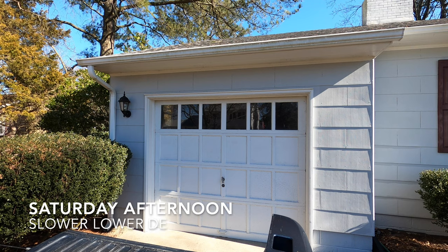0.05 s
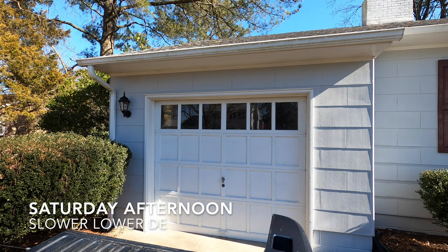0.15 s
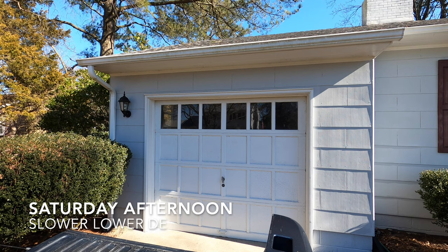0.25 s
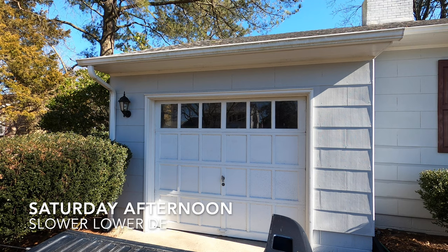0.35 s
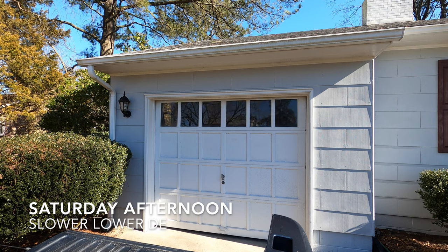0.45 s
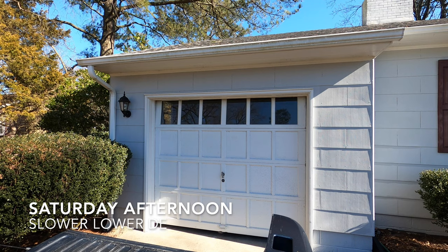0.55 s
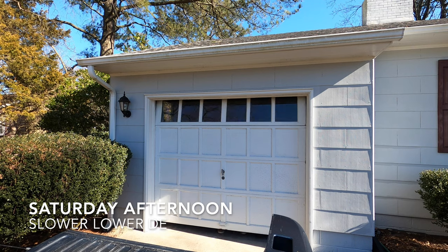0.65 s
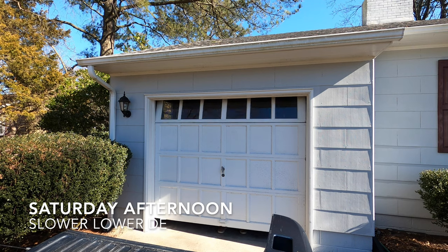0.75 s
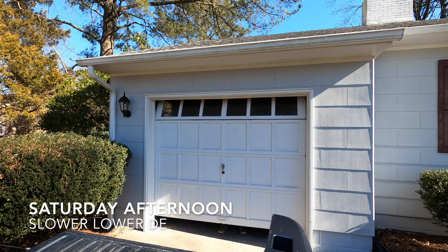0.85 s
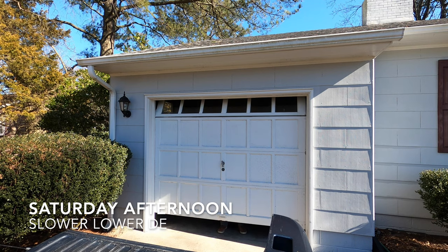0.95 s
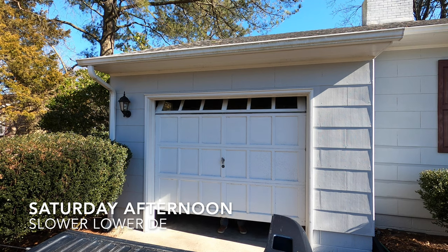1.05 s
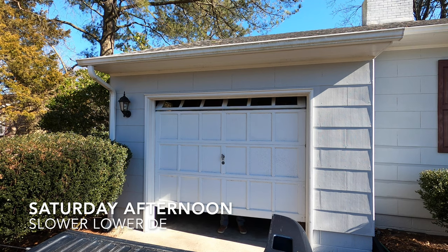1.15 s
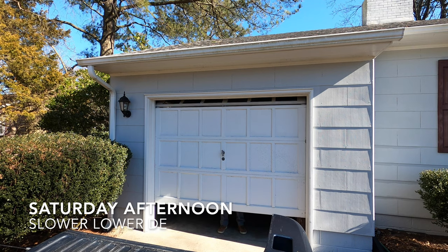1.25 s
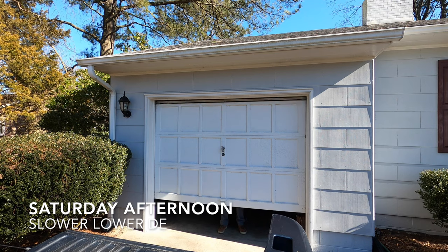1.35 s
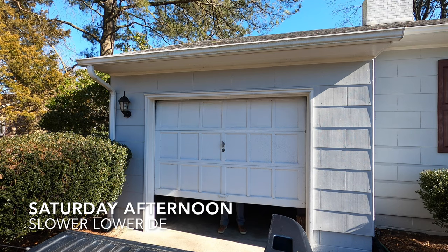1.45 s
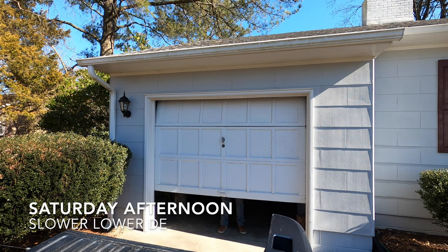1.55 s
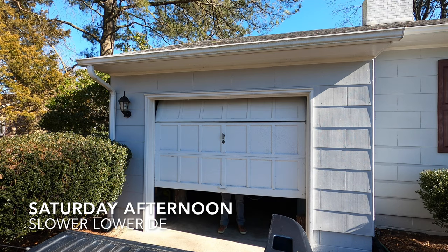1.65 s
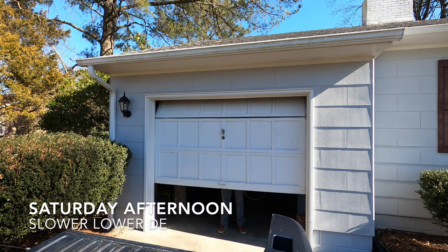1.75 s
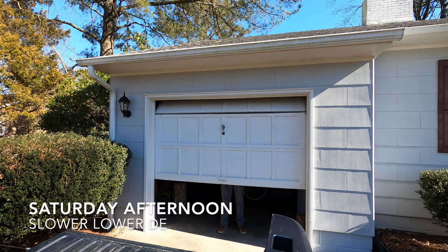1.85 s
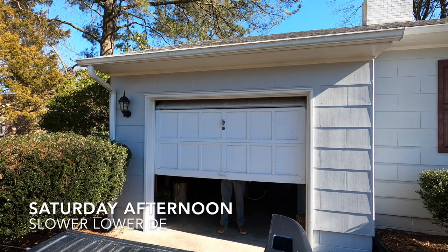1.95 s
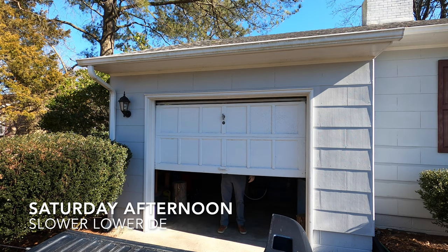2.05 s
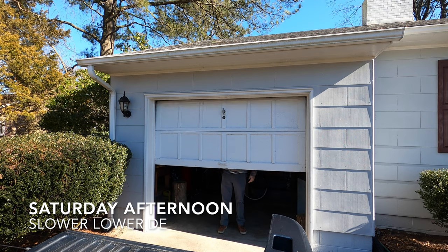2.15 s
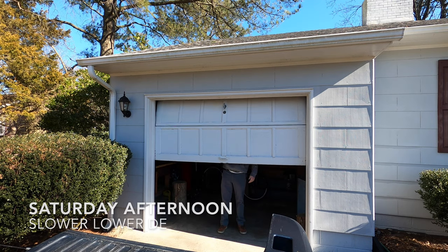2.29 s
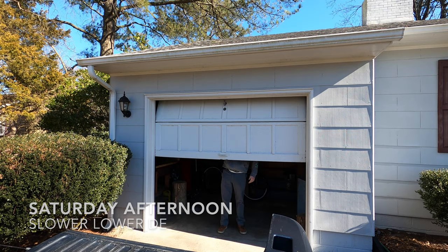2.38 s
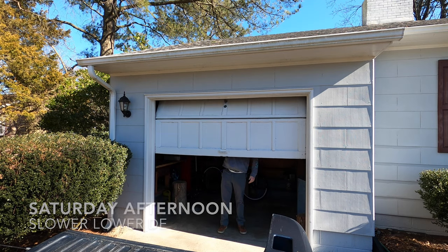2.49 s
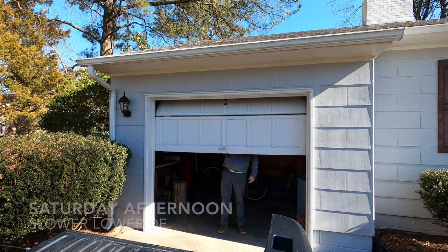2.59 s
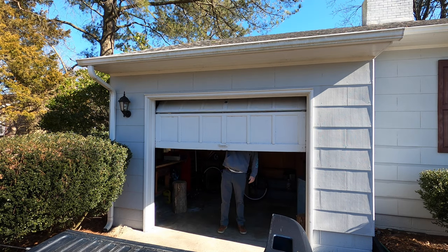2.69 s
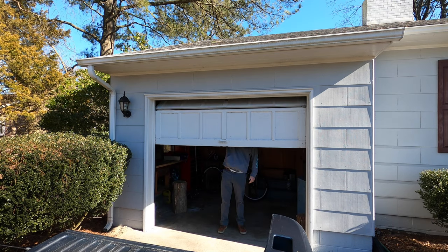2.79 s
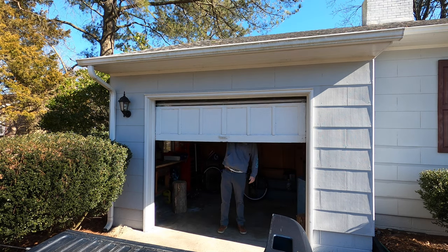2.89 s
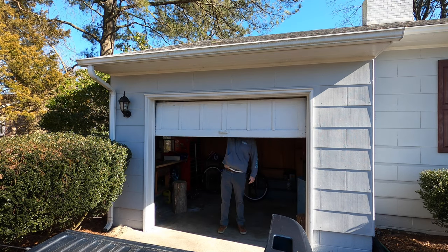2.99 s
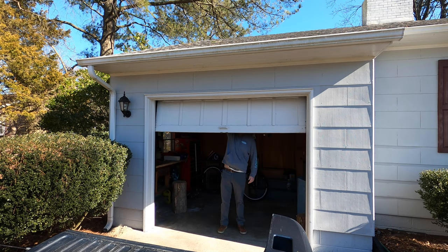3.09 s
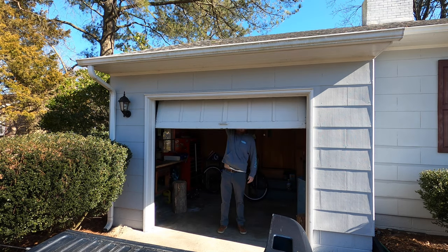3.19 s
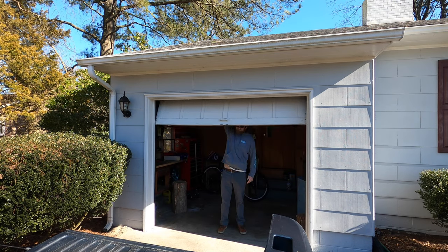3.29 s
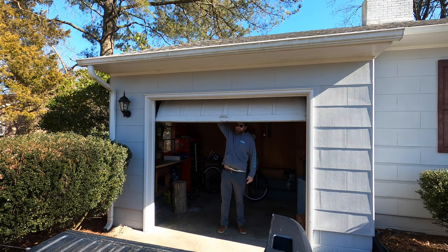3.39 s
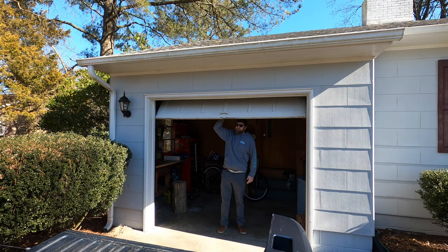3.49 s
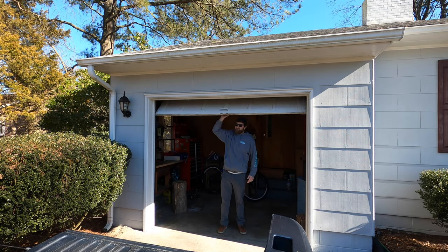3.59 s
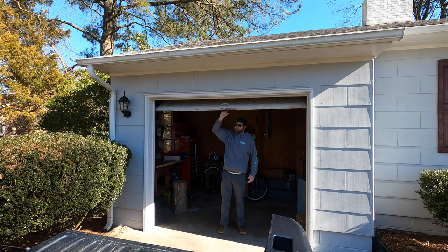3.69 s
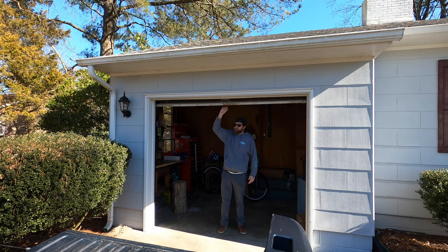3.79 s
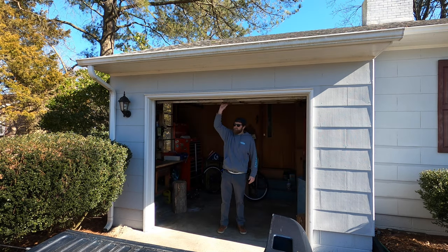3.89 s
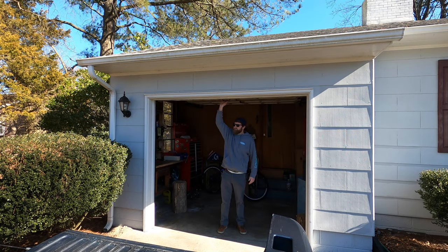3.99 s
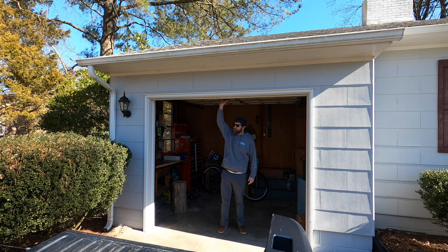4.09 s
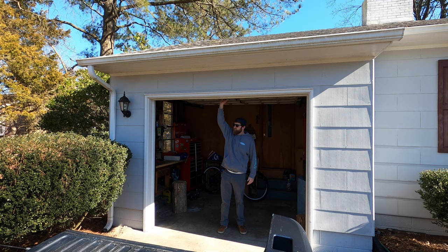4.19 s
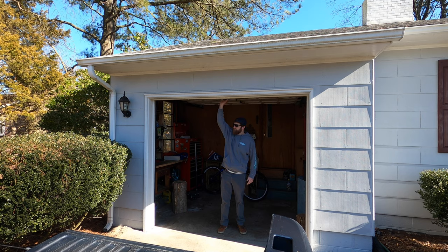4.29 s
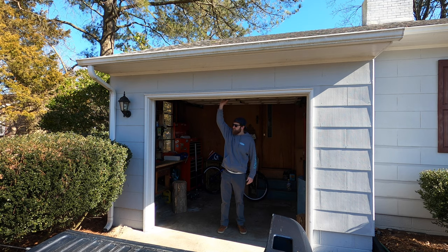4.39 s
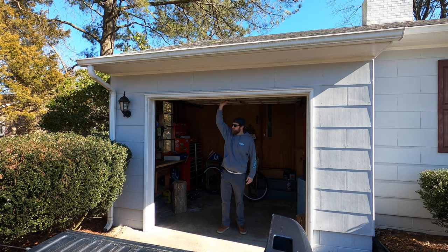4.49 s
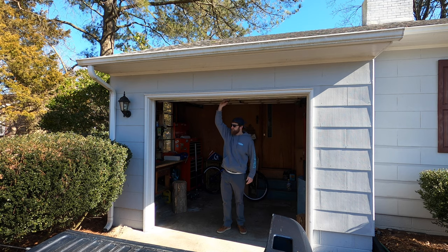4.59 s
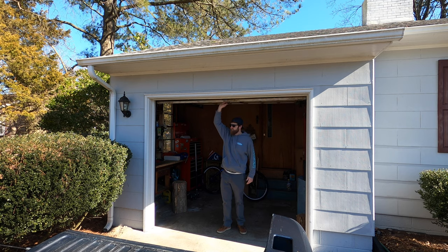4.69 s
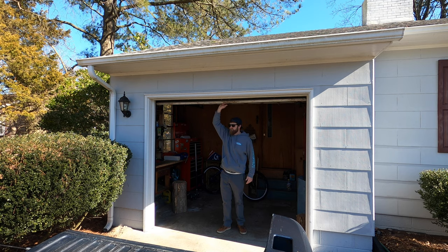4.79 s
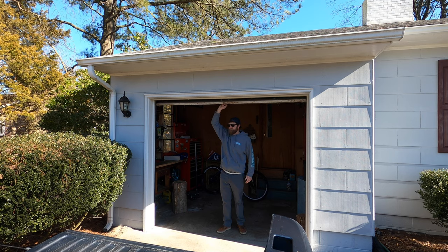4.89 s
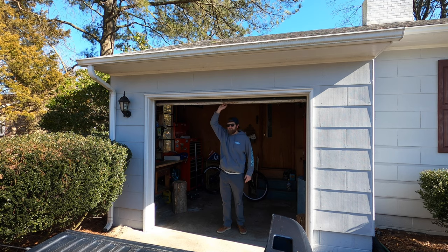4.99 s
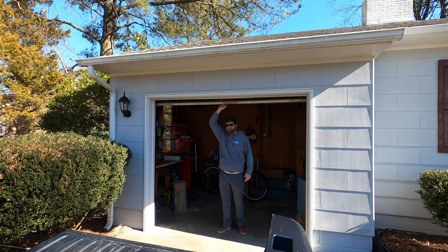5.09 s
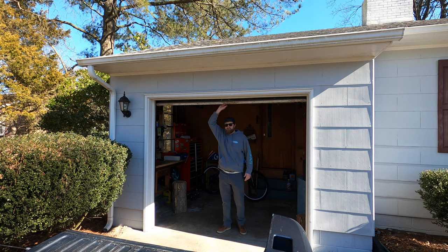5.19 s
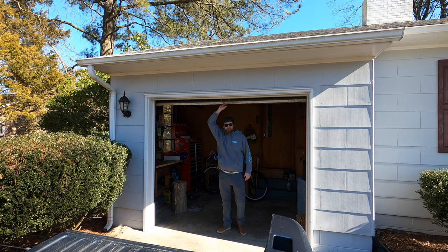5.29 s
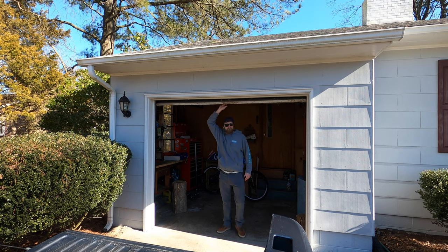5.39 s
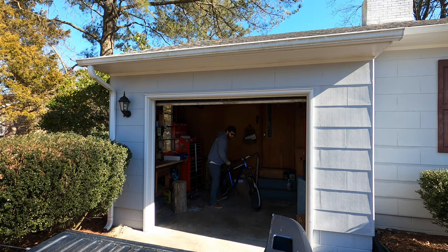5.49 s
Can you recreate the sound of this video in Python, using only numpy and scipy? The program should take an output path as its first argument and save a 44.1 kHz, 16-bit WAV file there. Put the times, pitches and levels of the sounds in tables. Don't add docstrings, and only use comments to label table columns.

```python
import sys
import numpy as np
from scipy import signal
from scipy.fft import rfft, irfft, next_fast_len
from scipy.io import wavfile
from scipy.ndimage import uniform_filter1d, map_coordinates

SR = 44100
rng = np.random.default_rng(int(sys.argv[2]) if len(sys.argv) > 2 else 0)


def to_wav(s):
    ch = np.atleast_2d(s).T
    pcm = np.round(np.clip(ch, -1, 1) * 32767)
    wavfile.write(sys.argv[1], SR, pcm.astype(np.int16))


def invert_db(level):
    return 10 ** (np.asarray(level, dtype=float) / 20)


N = 244622
STOP_S = 3.84
ECHO_SPAN_S = 0.2


def unit(x):
    return x / np.sqrt(np.mean(x ** 2) + 1e-20)


def along(points, hz):
    f, v = np.transpose(points)
    return np.interp(np.log(hz + 1), np.log(f + 1), v)


def curves(rows):
    s, *cols = np.transpose(rows)
    return [np.interp(np.arange(N) / SR, s, c) for c in cols]


def peaks_db(rows, rise_db_s, fall_db_s):
    rows = np.array(rows)
    late = np.arange(N) / SR - rows[:, :1]
    return np.max(rows[:, 1:] + np.where(late < 0, rise_db_s, -fall_db_s) * late, axis=0)


def wobble(rate):
    knots = rng.standard_normal(int(N * rate / SR) + 4)
    return map_coordinates(knots, [np.arange(N) * rate / SR])


def filtered(x, response):
    m = next_fast_len(len(x) + SR // 4)
    return irfft(rfft(x, m) * response(np.fft.rfftfreq(m, 1 / SR)), m)[:len(x)]


def resonances(modes):
    def response(f):
        return sum((-1) ** k * invert_db(db) * 1j * f * width / (hz * hz - f * f + 1j * f * width)
                   for k, (hz, width, db) in enumerate(modes))
    return response


def add(x, s, sound):
    part = x[round(s * SR):][:len(sound)]
    part += sound[:len(part)]


def patchy(x, depth_db):
    z = signal.stft(x, nperseg=256)[2]
    field = uniform_filter1d(rng.standard_normal(z.shape), size=3, axis=0)
    field = uniform_filter1d(field, size=9, axis=1)
    gain = invert_db(depth_db * (unit(field) - depth_db / 8))
    return signal.istft(z * gain, nperseg=256)[1][:N]


def yard():
    # start_s, hum_hz, hum_db
    machine = [(3.7, 120, -54), (3.864, 126.1, -63), (3.948, 126.2, -58), (4.276, 126.9, -59),
               (4.586, 127.8, -54), (4.8, 131.2, -55.5), (4.9, 130.7, -50), (5.19, 126.4, -51),
               (5.262, 124.1, -59.5), (5.385, 129, -59), (5.55, 125.5, -60)]
    # ratio, level_db
    partials = [(.63, -14), (0.999, -0.5), (1.63, -12)]
    # freq_hz, level_db per Hz
    air_tone = [(15, -64), (30, -59), (70, -27.5), (150, -12.5), (300, -18.5), (600, -25), (1500, -29.5),
                (4300, -41), (5500, -44), (10000, -55), (14000, -72)]
    # freq_hz, level_db per Hz
    hiss_tone = [(800, -30), (2000, 0), (4500, -3), (6000, -9), (10000, -15), (14000, -28)]
    # peak_s, peak_db
    shuffles = [
        (3.7, -59),
        (4.136, -65.5),
        (4.35, -68),
        (4.52, -68.5),
        (4.69, -63.5),
        (4.875, -59.5),
        (5.1, -64.5),
        (5.385, -60.5),
        (5.55, -54),
    ]
    hum_hz, hum_db = curves(machine)
    turns = np.cumsum(hum_hz) / SR
    hum = sum(invert_db(db + 1.4 * wobble(14)) * np.sin(2 * np.pi * ratio * turns + 0.35 * wobble(12))
              for ratio, db in partials)
    rustle_db = np.maximum(peaks_db(shuffles, rise_db_s=59, fall_db_s=50), -70)
    rustle_db = rustle_db - 2.5 + 0.8 * wobble(12)
    air = patchy(filtered(rng.standard_normal(N), lambda f: invert_db(along(air_tone, f))), 1.6)
    air = air / np.std(filtered(air, lambda f: f > 400))
    traffic = unit(filtered(rng.standard_normal(N), lambda f: resonances([(75, 80, 0)])(f) ** 2))
    hiss = unit(filtered(rng.standard_normal(N), lambda f: invert_db(along(hiss_tone, f))))
    return invert_db(-86.5) * hiss + invert_db(hum_db - 1.0) * hum + invert_db(rustle_db) * air + invert_db(-66) * traffic


def garage(x):
    # freq_hz, t60_s
    decay = [(100, .8), (500, 0.21), (3000, 0.4), (10000, 0.089)]
    out, step = np.zeros(N), round(ECHO_SPAN_S * SR)
    for start in range(0, N, step):
        hz, t, z = signal.stft(rng.standard_normal(SR * 3 // 4), SR, nperseg=256)
        dying = z * invert_db(-60 * t / along(decay, hz)[:, None])
        tail = signal.istft(dying, SR, nperseg=256)[1]
        echo = signal.fftconvolve(x[start:start + step], tail / np.linalg.norm(tail))
        add(out, (start + 250) / SR, echo)
    return out


def thumps():
    # start_s, pitch_hz, peak_db, t60_s
    swings = [(.0, 75, -34, 0.1), (.092, 113, -28, 0.09), (0.18, 156, -25, 0.038), (0.213, 124, -32, 0.16),
              (0.399, 116, -41, 0.079), (.512, 130, -37, .07), (.637, 125, -31, 0.075),
              (.66, 80, -38.5, .12), (0.98, 121, -36.5, 0.042), (1.075, 135, -28.5, 0.17),
              (1.18, 160, -26, 0.1), (1.21, 124, -25, 0.11), (1.255, 110, -31, .08), (1.3, 125, -32, .1),
              (1.36, 120.7, -24, 0.2), (1.41, 116.4, -27, 0.38), (1.546, 140, -32, 0.059),
              (1.629, 116, -35.5, 0.065), (1.94, 125, -38, .08), (1.991, 126, -37, 0.1),
              (2.04, 150, -39, .07), (2.085, 130, -39, .1), (2.73, 125, -38, .08), (2.805, 140, -39, .06),
              (2.2, 140, -41, .15), (2.33, 135, -39, .2), (2.43, 130.9, -36, 0.45), (2.6, 132, -42, 0.31),
              (2.849, 129, -37.5, 0.18), (2.899, 85, -37, 0.1), (3.03, 85, -39, .15), (2.4, 85, -41, .15),
              (3.15, 85, -37.5, 0.13), (3.259, 131, -29.5, 0.091), (3.327, 130, -27, .05),
              (3.368, 128, -26, 0.11), (3.51, 130, -35, .12), (3.615, 125, -42, .2), (3.775, 100, -50, .08),
              (3.438, 106, -30.5, 0.16), (3.72, 85, -47.5, .25), (5.528, 110.3, -47, 0.22)]
    # start_s, pitch_hz, peak_db
    knocks = [(.037, 390, -36), (.048, 780, -34), (.06, 420, -35), (.575, 600, -33), (.7, 390, -31),
              (.645, 1100, -34), (.727, 452, -30), (.815, 670, -32), (.85, 410, -31), (1.01, 660, -33),
              (1.078, 417, -32), (1.11, 780, -33), (1.14, 770, -32), (1.19, 740, -33), (1.21, 620, -32),
              (1.25, 620, -32), (.69, 1100, -36), (1.47, 910, -36), (1.153, 470, -30), (1.283, 401, -33),
              (1.327, 452, -32), (1.44, 900, -36), (1.47, 380, -33), (1.61, 490, -37), (1.865, 400, -35),
              (1.985, 390, -36), (2.18, 300, -37), (2.313, 415, -39), (2.49, 930, -39), (2.497, 423, -38),
              (2.54, 334, -36), (2.737, 500, -38), (3.062, 920, -33), (3.133, 950, -33), (3.202, 920, -35),
              (3.225, 400, -33), (3.313, 420, -29), (3.344, 423, -29), (3.357, 940, -32), (3.44, 400, -33),
              (3.65, 415, -47), (3.7, 400, -49), (.56, 519, -31), (.615, 479, -26.5), (.797, 385, -31),
              (1.37, 467, -25), (2.421, 411, -32), (2.563, 402, -31), (2.7, 436, -37), (2.78, 360, -37),
              (2.85, 395, -39.5), (2.924, 470, -42), (2.997, 473, -34), (3.064, 477, -37),
              (3.135, 385, -34), (3.2, 396, -30), (3.285, 441, -30), (4.67, 322, -60), (4.86, 396, -60.5),
              (5.2, 207, -60.5), (5.362, 420, -58.5)]
    out, t = np.zeros(N), np.arange(SR // 2) / SR
    blows = [(*row, 0.083 * row[3]) for row in swings]
    for s, hz, db in knocks:
        t60 = 0.06 if s < STOP_S else 0.13
        blows.append((s, hz, db, t60, 0.003))
    for s, hz, db, t60, rise in blows:
        shape = invert_db(db - 60 * t / t60) * (1 - np.exp(-t / rise))
        add(out, s, shape * np.sin(2 * np.pi * hz * t) * 2)
    return out


def latch_bar():
    # start_s, peak_db
    clinks = [
        (0.904, -43.5),
        (1.0983, -30),
        (1.302, -36.5),
        (1.379, -21.5),
        (1.4748, -27),
        (1.693, -45),
        (2.3347, -51),
    ]
    # pitch_hz, level_db, t60_s
    modes = [(3970, -3.5, 0.14), (4540, -11, 0.1), (7270, -6, 0.13), (7600, 3, .025), (8120, -6.5, 0.037),
             (9502, -25.5, .15), (11800, -24.5, 0.16), (12400, -26.5, .17)]
    out, t = np.zeros(N), np.arange(SR // 3) / SR
    shape = (1 - np.exp(-t / 0.0006)) * (1 - 0.38 * np.sin(2 * np.pi * 38 * t))  # attack, 38 Hz rocking
    for s, db in clinks:
        ring = sum(invert_db(level + rng.normal(0, 1.1) - 60 * t / t60) * np.sin(2 * np.pi * hz * t)
                   for hz, level, t60 in modes)
        add(out, s, invert_db(db - 5) * ring * shape)
    return out


def brackets():
    # (start_s, peak_db)
    struck = [(1502, .015, [(1.3684, -22)]), (3196, 0.042, [(1.567, -32.5), (1.627, -40), (3.274, -27.5),
              (4.076, -52), (4.862, -50)]), (4110, 0.09, [(1.256, -33), (1.8, -42), (2.424, -42),
              (2.775, -44)]), (3950, .16, [(2.996, -42.5), (3.212, -41), (3.24, -40), (3.285, -38),
              (3.312, -32)]), (4200, .025, [(1.115, -30), (1.152, -30), (1.28, -31), (1.311, -28),
              (1.326, -23), (1.343, -27)]), (4450, .04, [(1.095, -28), (1.128, -28), (1.352, -28),
              (1.478, -31), (1.948, -40), (2.74, -43)]), (2150, .08, [(1.86, -42), (2.424, -38),
              (2.985, -40)]), (2450, .08, [(2.355, -41), (3.065, -37), (3.145, -36), (3.35, -32)]),
              (3330, .05, [(1.629, -33), (2.931, -39)]), (6900, .06, [(.59, -34), (2.978, -47)]),
              (5115, 0.014, [(3.2716, -23.5), (3.3098, -13.5)]), (6170, 0.078, [(.18, -46), (0.306, -49.5),
              (2.012, -51), (3.3404, -32)]), (6550, .037, [(1.21, -42), (2.979, -47)]),
              (7250, 0.04, [(0.011, -40.5), (0.527, -42.5), (.79, -40), (1.849, -49), (2.335, -52),
              (3.137, -45), (4.071, -56)])]
    out, t = np.zeros(N), np.arange(SR // 4) / SR
    for hz, t60, blows in struck:
        for s, db in blows:
            drift = 0.11 * np.cumsum(rng.standard_normal(len(t)))
            shape = invert_db(db - 60 * t / t60) * (1 - np.exp(-t / 0.00085))
            add(out, s, shape * np.sin(2 * np.pi * hz * t + drift))
    return out


def contacts():
    # start_s, peak_db, weight_db, t60_s
    slaps = [
        (0.0, -34, -15, .03),
        (0.0105, -36, -20, .06),
        (0.0344, -27, -0.5, 0.19),
        (0.0469, -27.5, -5, 0.21),
        (1.3074, -25.5, -1.5, 0.099),
        (1.3268, -21, -16, 0.07),
        (1.348, -21.5, -4, 0.08),
        (1.3768, -24, -26, 0.088),
        (3.3413, -20, -2, 0.11),
    ]
    # start_s, peak_db, weight_db, t60_s
    snaps = [(0.1794, -33.5, 1.5, 0.36), (0.389, -50.5, -7, .15), (0.5838, -20, -16.5, 0.14),
             (1.0227, -26.5, -4, 0.25), (1.2101, -23.5, -10, 0.22), (1.3688, -17, -5, 0.07),
             (1.4771, -27, -15.5, 0.12), (1.5942, -31.5, -18, 0.4), (2.011, -36, 0, 0.17),
             (2.3328, -33, -5.5, 0.31), (3.1333, -25, 2.5, 0.18), (3.271, -20, -10.5, 0.09),
             (3.3086, -19, -15.5, 0.079)]
    # start_s, peak_db, weight_db
    bumps = [(0.3035, -35, -8), (0.4758, -34, 5.5), (0.6134, -23, 1), (0.8365, -21, -2),
             (1.1271, -20.5, -6.5), (1.2547, -23.5, -8.5), (1.5658, -32.5, -7), (1.6259, -28, 0.5),
             (1.689, -36, -20), (1.7898, -34, -2), (1.8581, -31.5, 3), (1.944, -34, 0.5), (2.0686, -36, -5),
             (2.1535, -33.5, 2.5), (2.224, -36.5, 7), (2.4212, -29, -8.5), (2.4968, -32.5, -2),
             (2.5604, -33.5, 2.5), (2.6634, -38.5, -4), (2.7012, -34.5, 9.5), (2.7721, -42, -9.5),
             (2.817, -38.5, -7), (2.8468, -29.5, -9.5), (2.922, -29, 0), (2.9791, -30.5, -5),
             (2.9975, -40, 2), (3.061, -26, 2), (3.201, -25, -10.5), (3.3703, -24, -12.5),
             (3.437, -32.5, -7)]
    # start_s, peak_db, weight_db, t60_s
    ticks = [(3.548, -51, -9, .08), (3.5702, -45.5, 2, .2), (3.742, -55.5, 1, 0.13),
             (3.78, -53.5, 6, 0.091), (3.899, -69, -11, 0.1), (3.9744, -66, -7, 0.11),
             (4.0127, -63.5, 5.5, .14), (4.0565, -66, -1.5, .12), (4.072, -45, -30, .055),
             (4.651, -62.5, 9, .12), (4.7394, -62, -7, .25), (4.8557, -54, -8, .09),
             (4.862, -44.5, -9, 0.14), (5.0994, -67, 9, .11), (5.1292, -68, 3, .12), (5.315, -63, -6, .3),
             (5.345, -63.5, -10, 0.31)]
    # start_s, peak_db, weight_db, t60_s
    scrapes = [
        (0.5234, -30, -1.5, 0.64),
        (0.642, -23, -11, 0.44),
        (0.7589, -28, -12.5, 0.13),
        (0.778, -29, -8, .15),
        (0.9, -24.5, -11, 0.18),
        (1.0914, -23, -12, 0.3),
        (2.655, -38, -6, .15),
    ]
    bumps = [(*row, 0.13) for row in bumps]
    # rows, hinge dB, sizzle dB, thin parts lost per dB of weight, rise s
    kinds = [(slaps, -18.5, -21.5, 0.5, 0.0007), (snaps, -20.5, -32, 0.39, 0.0006),
             (bumps, -25.5, -34.5, 0.05, 0.0018), (ticks, -13.5, -24, 0.27, 0.0007),
             (scrapes, -18, -24, 0.3, 0.005)]
    found = []
    for rows, hinge_db, sizzle_db, lost, rise in kinds:
        for row in rows:
            dulled_db = lost * row[2]
            found.append((*row, hinge_db - dulled_db, sizzle_db - 0.53 * dulled_db, rise))
    return sorted(found)


def clacks():
    panels, tracks, hinges, edges = np.zeros((4, N))
    t = np.arange(SR // 3) / SR
    for s, db, weight_db, t60, hinge_db, sizzle_db, rise in contacts():
        noise = rng.standard_normal((5, len(t)))
        bounces = invert_db(1.7 * unit(uniform_filter1d(noise[4], 150)))
        attack = 1 - np.exp(-t / rise)
        shape = invert_db(db) * attack * (bounces * invert_db(-60 * t / t60) + 0.31 * invert_db(-60 * t / 0.0047))
        crack = 0.71 * invert_db(db - 60 * t / 0.011) * attack
        late = 1 - np.exp(-t / 0.0016)
        thin_db = -10 * t / t60
        add(panels, s, noise[0] * shape * invert_db(weight_db) * late)
        add(tracks, s, noise[1] * shape)
        add(hinges, s, noise[2] * (shape + crack) * invert_db(hinge_db + thin_db))
        add(edges, s, noise[3] * (shape + crack) * invert_db(sizzle_db + thin_db))
    below_5k = signal.cheby1(6, 1, 5000, analog=True)
    panel_modes = resonances([(450, 300, 0), (900, 600, -5)])
    track_modes = resonances([(1800, 2300, 0.8), (4200, 1900, 0.3)])
    knock = filtered(panels, lambda f: panel_modes(f) / (1 + 1j * f / 2200) ** 2)
    rattle = filtered(tracks, lambda f: signal.freqs(*below_5k, f)[1] * track_modes(f))
    hinge = filtered(hinges, lambda f: resonances([(6600, 4800, 0)])(f) ** 4)
    sizzle = filtered(edges, lambda f: resonances([(10300, 7000, 0)])(f) ** 4)
    return invert_db(6.5) * knock + invert_db(-1.65) * rattle + invert_db(5.0) * hinge + invert_db(0.5) * sizzle


def grit(share, spread_db, smooth_db):
    u, size, noise = rng.random(N), rng.standard_normal(N), rng.standard_normal((2, N))
    impacts = (u < share) * invert_db(spread_db * np.clip(size, -2, 2)) * np.sign(noise[0])
    return unit(unit(impacts) + invert_db(smooth_db) * noise[1])


def sheet_metal(x, t60):
    out, t, step = x.copy(), np.arange(SR // 10) / SR, round(ECHO_SPAN_S * SR)
    for start in range(0, N, step):
        ring = rng.standard_normal(len(t)) * invert_db(-60 * t / t60)
        add(out, start / SR, 0.4 * signal.fftconvolve(x[start:start + step], ring / np.linalg.norm(ring)))
    return out


def rails(f):
    # freq_hz, level_db per Hz
    grind_tone = [(400, -23), (800, -3.5), (2000, -5.5), (3000, -5), (4750, -9), (5200, -12), (7400, -20),
                  (9000, -25), (12000, -31.5), (15000, -43)]
    # freq_hz, width_hz, level_db
    modes = [(1978, 190, -14), (3140, 300, -13), (3450, 9.7, -20.5), (4130, 450, -4.5), (5630, 150, -24),
             (6300, 13, -5.5), (7300, 59, -15.5), (8460, 130, -20.5), (9530, 44, -19), (11600, 35, -25)]
    return invert_db(along(grind_tone, f)) * (1 + 3 * resonances(modes)(f))


def steadied(x, share):
    swell = np.abs(signal.hilbert(x, next_fast_len(N))[:N])
    return unit(x / (swell + 0.12) ** np.clip(share, 0, 1))


def rollers():
    # start_s, panel_flex_db, roller_pressure_db
    push = [(0.0, -40, -38), (0.22, -39, -45.5), (0.53, -39.5, -39.5), (0.72, -33.5, -34.5),
            (0.82, -33.5, -32.5), (1.11, -34.5, -35), (1.27, -33, -35.5), (1.37, -35.5, -31.5),
            (1.66, -42, -46.5), (1.79, -44.5, -46.5), (2.28, -41, -48), (2.74, -40.5, -46),
            (3.27, -39, -45.5), (3.34, -33, -38.5), (3.45, -36.5, -45), (3.66, -49, -61.5), (3.8, -65, -78),
            (3.9, -63.5, -92)]
    # peak_s, peak_db
    jolts = [
        (0.05, -44.5),
        (0.4, -52),
        (1.24, -48),
        (1.43, -43),
        (3.41, -48),
        (3.56, -48.5),
    ]
    # freq_hz, width_hz, level_db
    boom_modes = [(101.2, 30, -1.5), (135, 60.6, 1)]
    # freq_hz, width_hz, level_db
    panel_modes = [(418, 310, 4)]
    # freq_hz, level_db per Hz
    body_tone = [(15, -56.5), (25, -31.5), (59, -24), (134, -5.5), (190, -5.5), (270, -7), (408, -4),
                 (723, -11), (1300, -16.5), (1800, -17), (2340, -44.5), (3960, -120)]
    body_db, grind_db = curves(push)
    jolt_db = peaks_db(jolts, rise_db_s=79.5, fall_db_s=73)
    moving = np.interp(np.arange(N) / SR, [STOP_S, STOP_S + 0.16], [1, 0])
    chatter = wobble(15)

    boom = unit(filtered(rng.standard_normal(N), lambda f: resonances(boom_modes)(f) ** 2))
    boom = steadied(boom, 0.4)
    body = filtered(grit(0.02, 2.8, 0),
                    lambda f: invert_db(along(body_tone, f)) * (1 + 0.5 * resonances(panel_modes)(f)))
    body = unit(patchy(body, 1.5))
    grind = unit(patchy(filtered(sheet_metal(grit(0.02, 2.3, 0), 0.03), rails), 1.8))
    bright_db = -2 + 0.63 * np.clip(jolt_db + 54.5, 0, None)
    upper = filtered(grind, lambda f: 1 / (1 + (5200 / (f + 1)) ** 8))
    grind = grind + (invert_db(bright_db) - 1) * upper
    shudder = unit(filtered(rng.standard_normal(N), lambda f: resonances([(62, 40, 0)])(f) ** 2))

    boom_level = np.hypot(invert_db(body_db - 13), invert_db(jolt_db + 0.2))
    shudder_level = invert_db(jolt_db - 3.5) + invert_db(-52 + 1.3 * (grind_db + 35.5))
    door = boom_level * boom + invert_db(body_db - 1.5 + 0.37 * chatter) * body
    door = door + invert_db(grind_db - 2.0 + 0.54 * chatter) * grind
    return moving * (door + shudder_level * shudder)


def scene():
    hits = patchy(clacks(), 1.9)
    rings = brackets() + latch_bar()
    echo = garage(invert_db(-6.5) * hits + invert_db(-6.0) * rings)
    door = rollers() + hits + rings + thumps() + echo
    return (door + yard())[None]


def low_pass(x):
    return signal.sosfilt(signal.butter(12, 15000, fs=SR, output="sos"), x)


def record(dry):
    # freq_hz, level_db
    mic_tone = [(20, -12), (45, -7), (90, 1.5), (11500, 0.5), (12800, -5.5), (14000, -12.5), (15500, -24)]
    dip = resonances([(5170, 560, 0)])
    heard = filtered(dry[0], lambda f: invert_db(along(mic_tone, f)) * (1 - 0.36 * dip(f)))
    fade = np.interp(np.arange(N) / SR, [5.378, 5.391, 5.524, 5.534], [1, 0, 0, 1])
    mix = (heard * fade)[None]
    return low_pass(mix)


dry = scene()
out = record(dry)
to_wav(out)
```